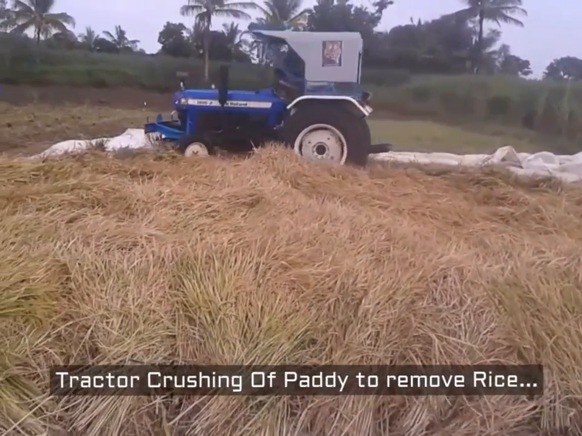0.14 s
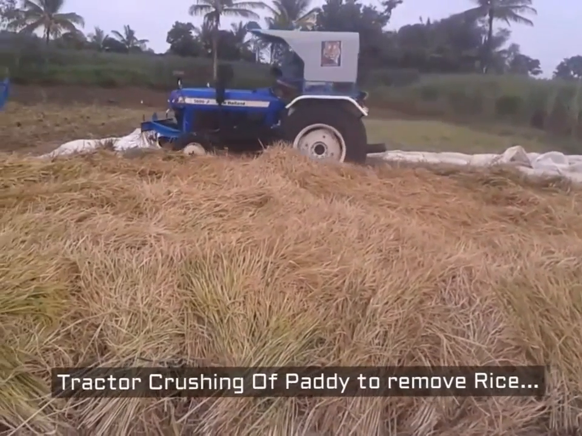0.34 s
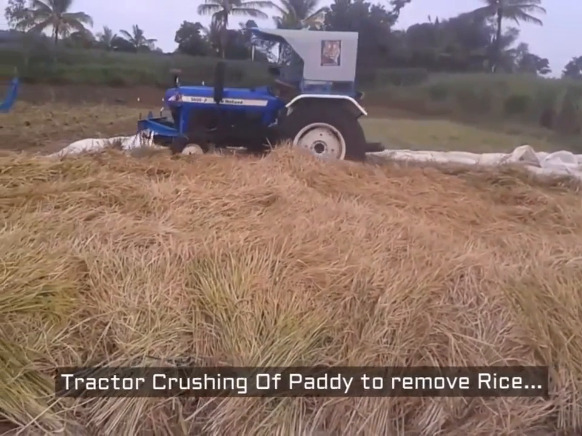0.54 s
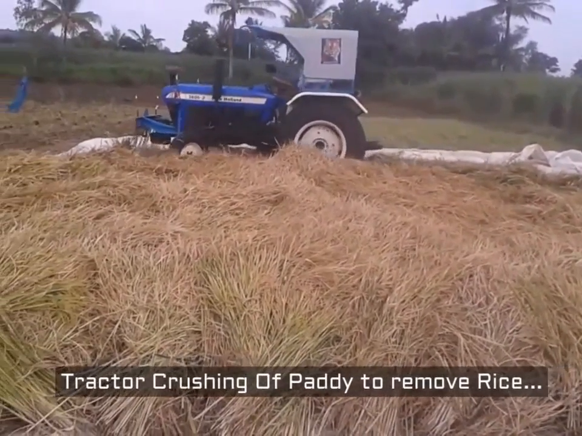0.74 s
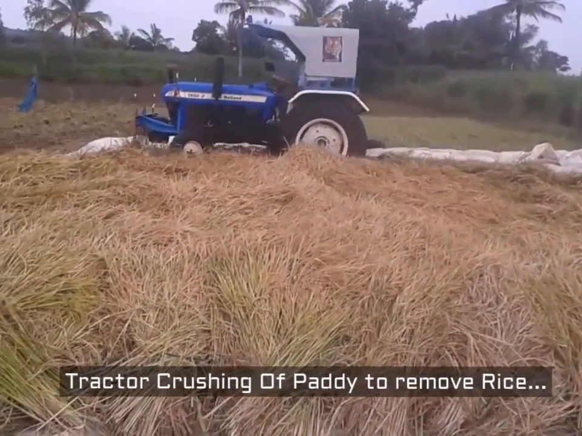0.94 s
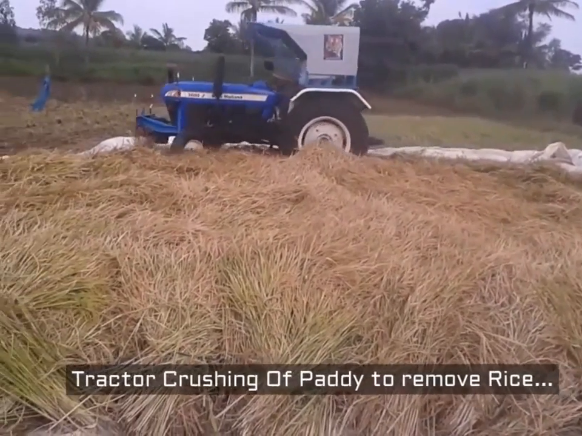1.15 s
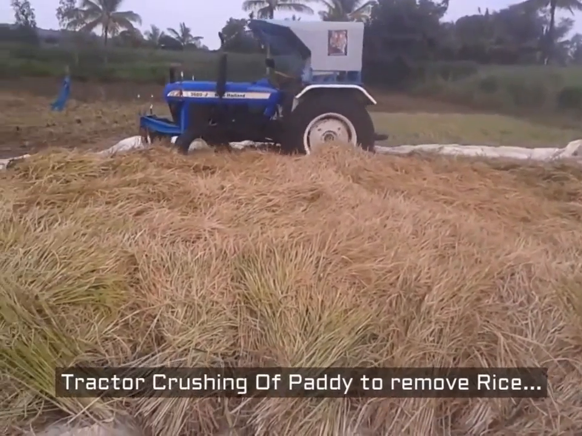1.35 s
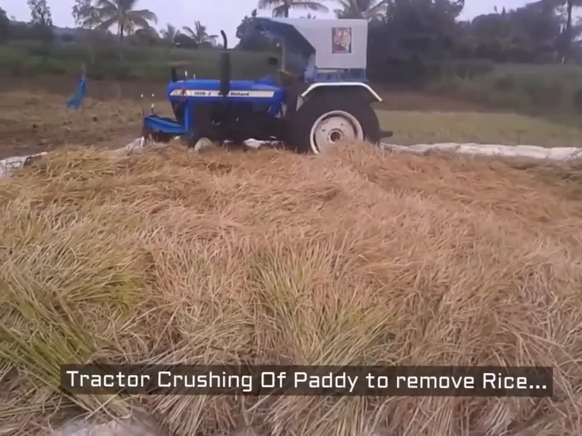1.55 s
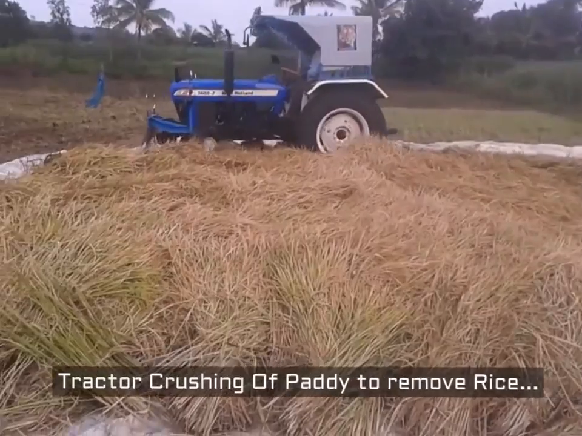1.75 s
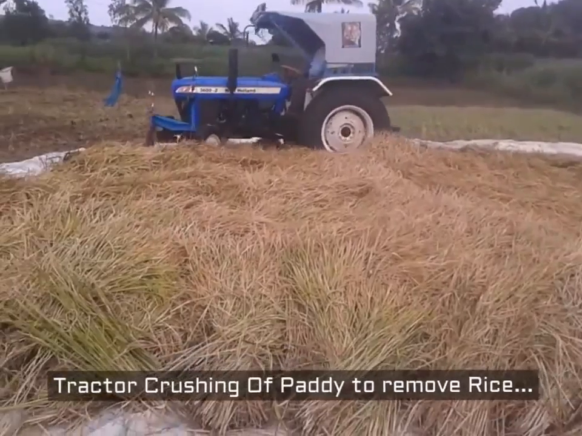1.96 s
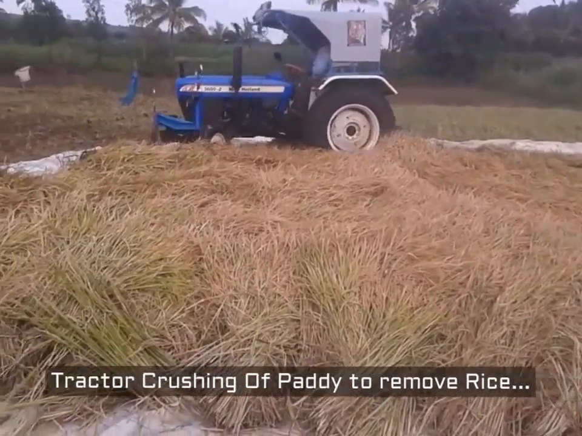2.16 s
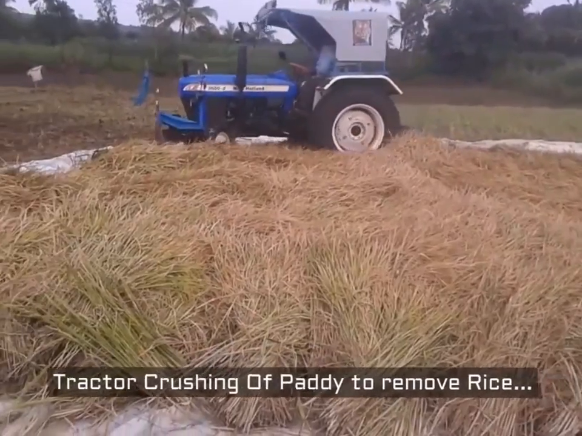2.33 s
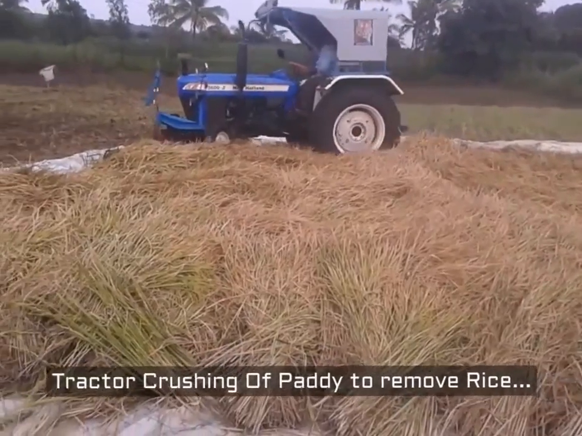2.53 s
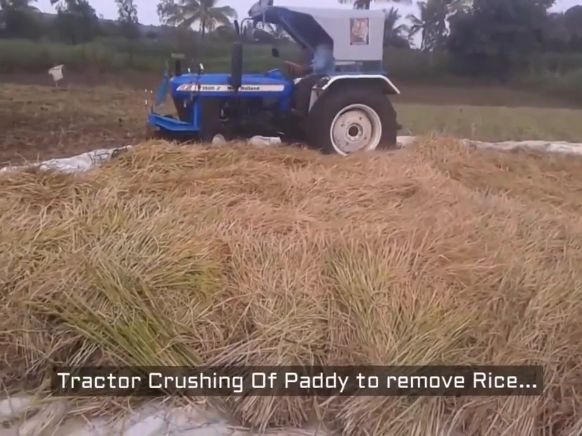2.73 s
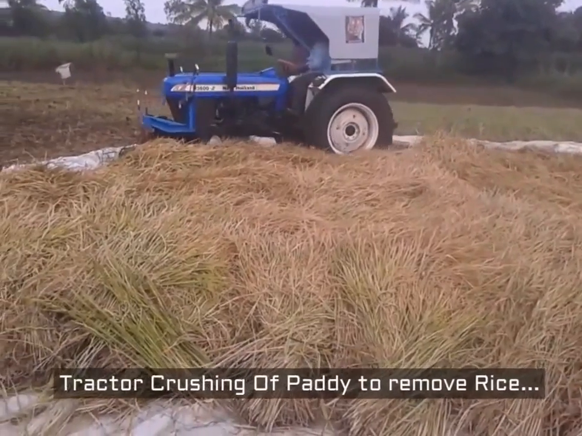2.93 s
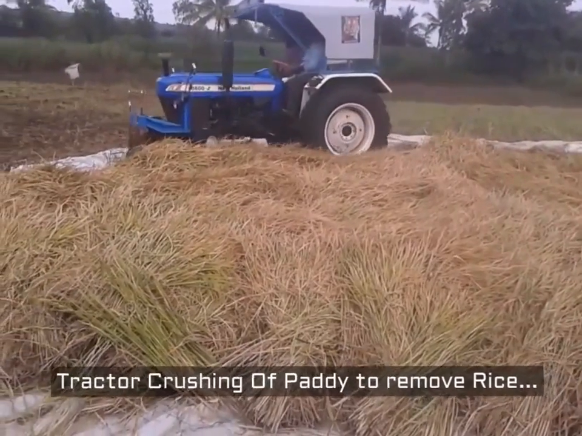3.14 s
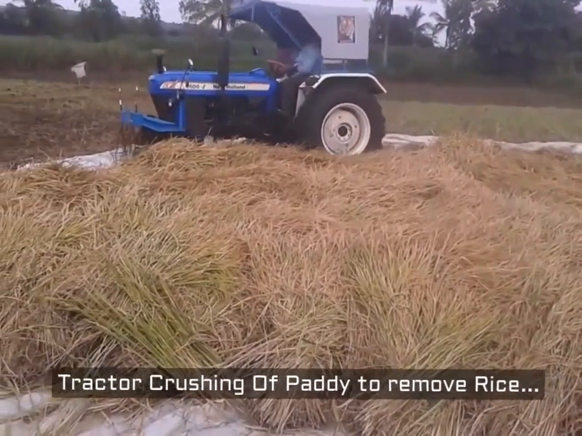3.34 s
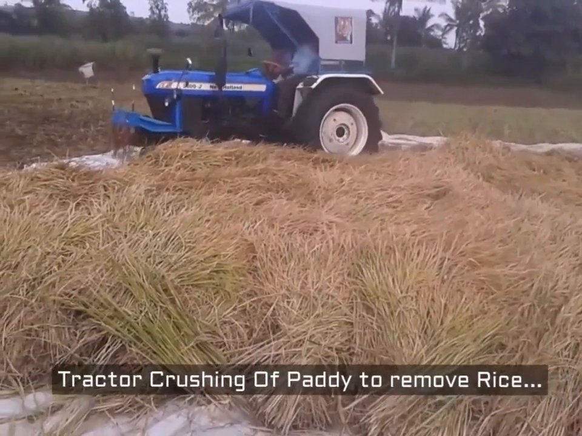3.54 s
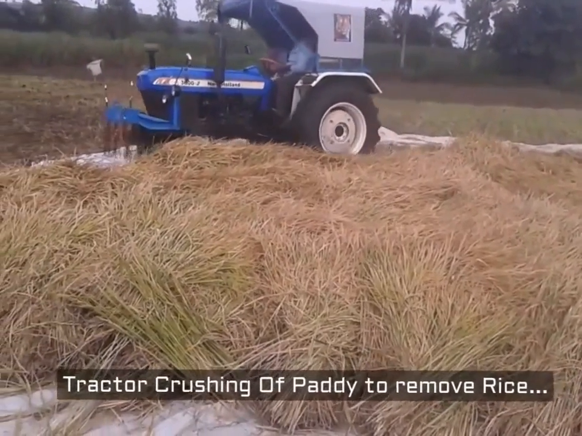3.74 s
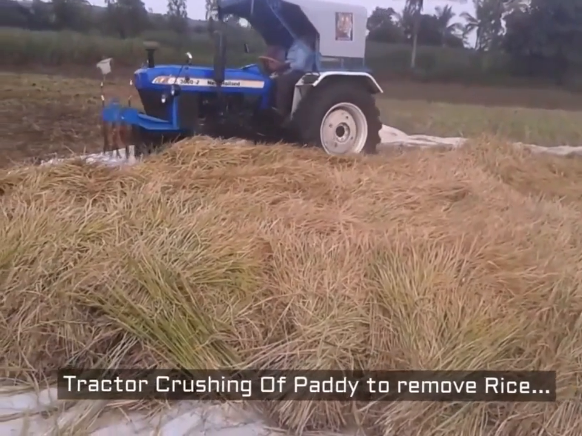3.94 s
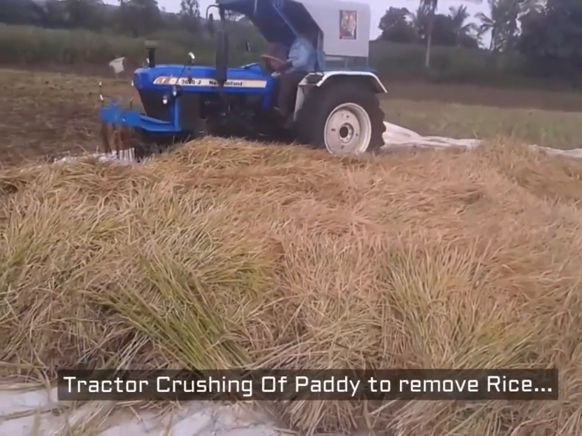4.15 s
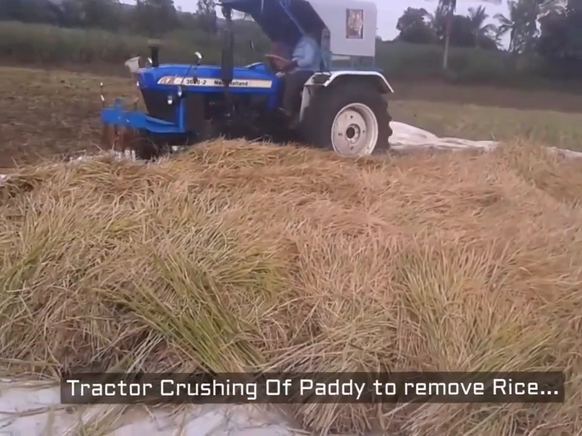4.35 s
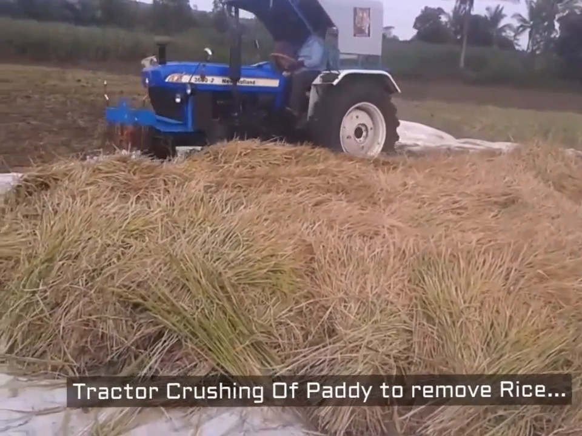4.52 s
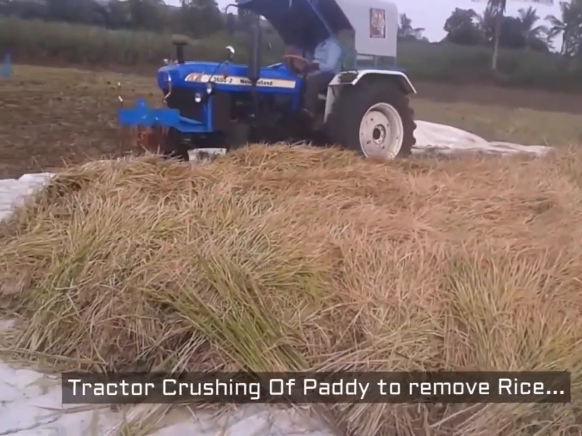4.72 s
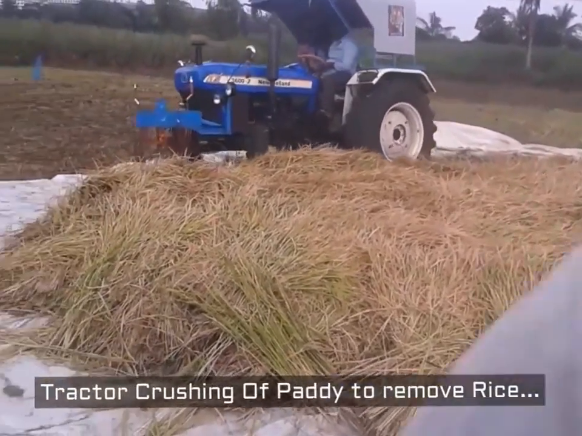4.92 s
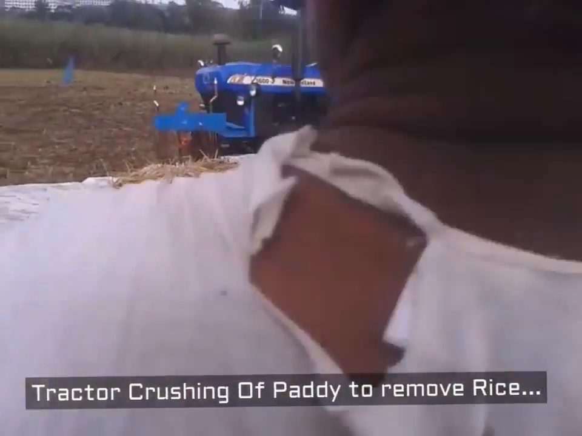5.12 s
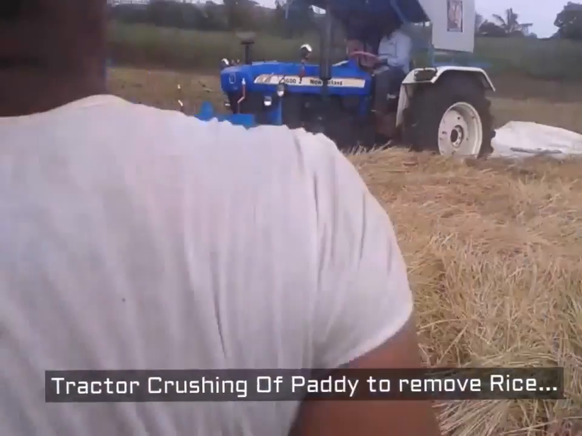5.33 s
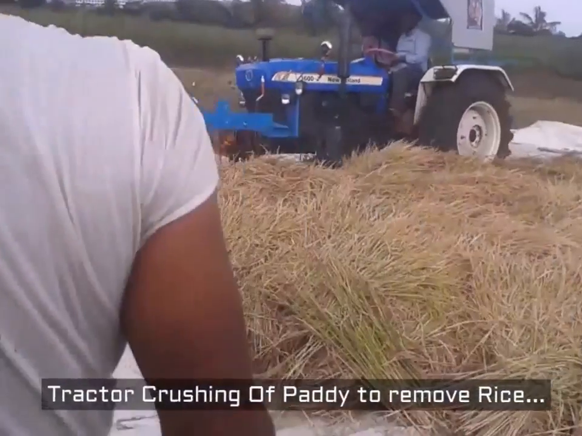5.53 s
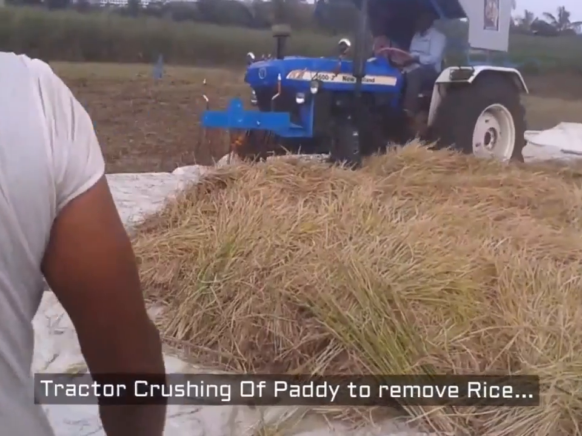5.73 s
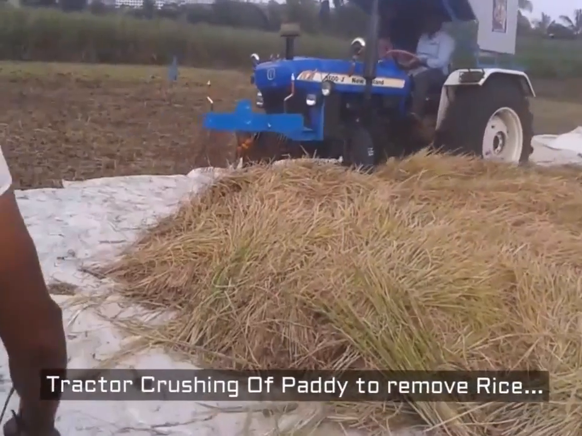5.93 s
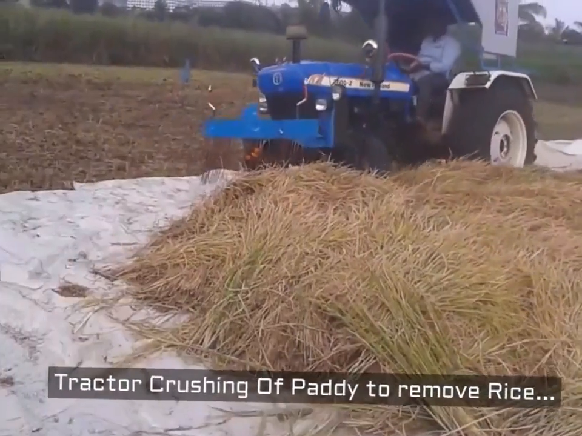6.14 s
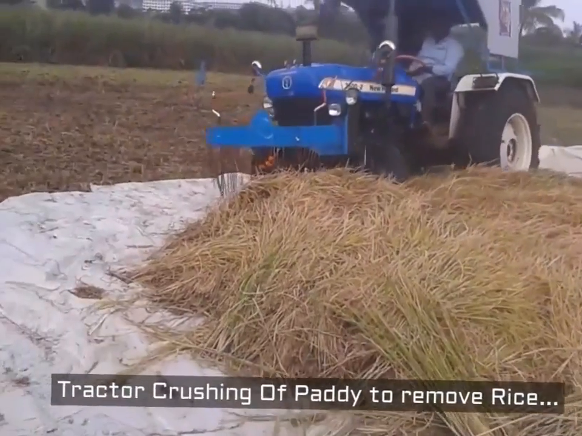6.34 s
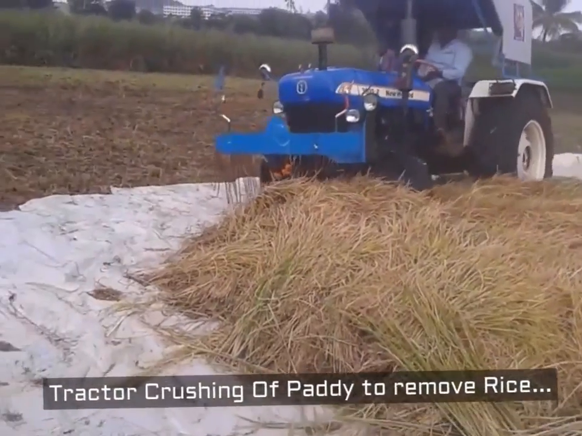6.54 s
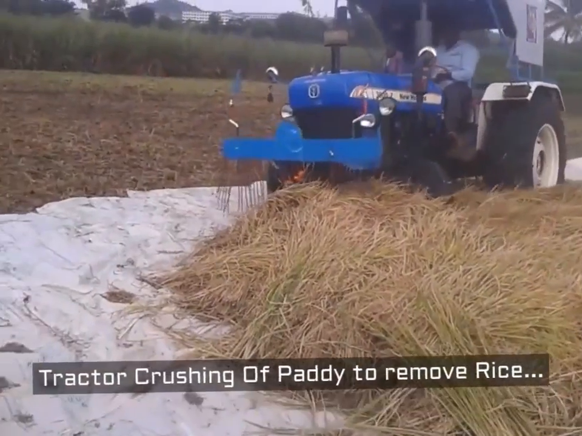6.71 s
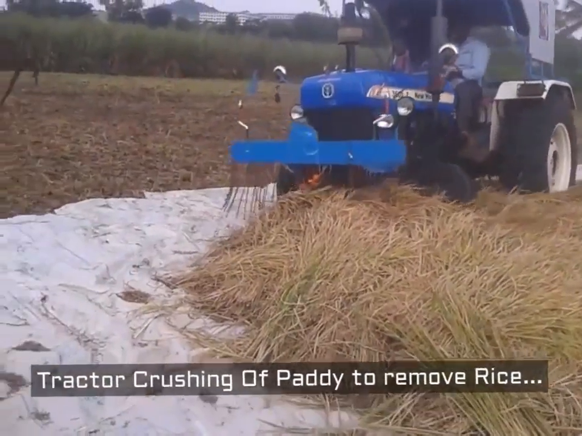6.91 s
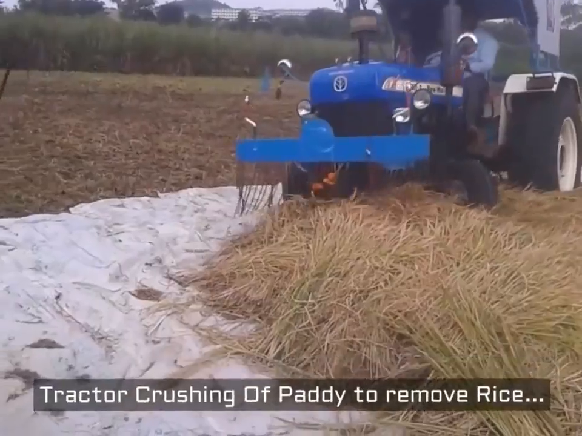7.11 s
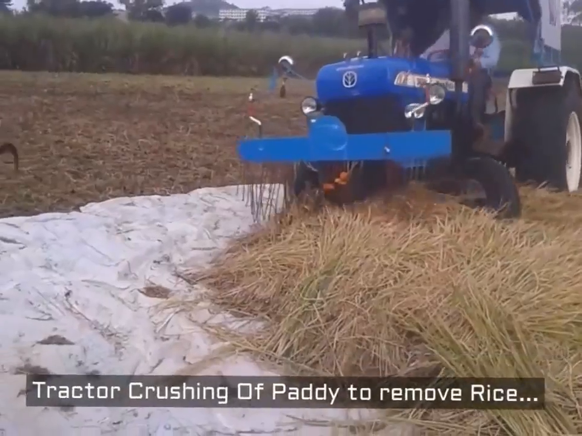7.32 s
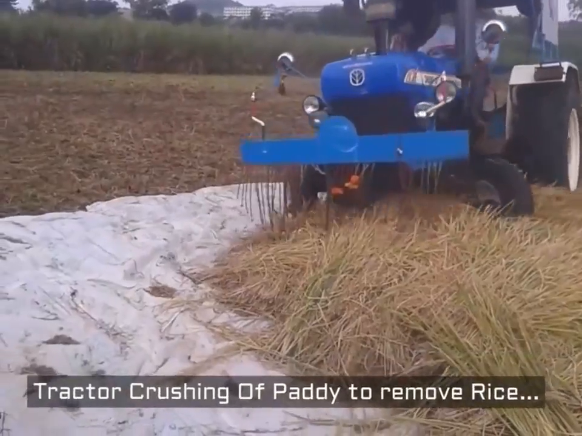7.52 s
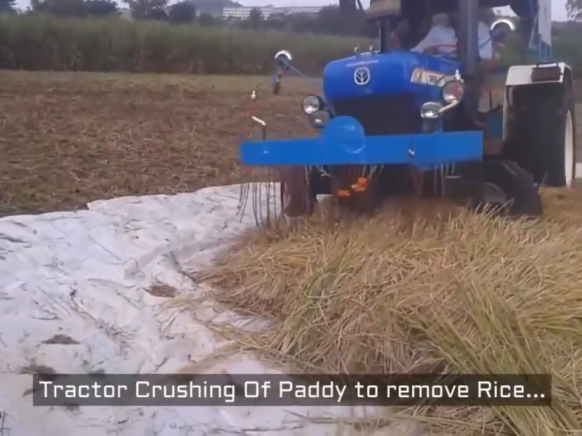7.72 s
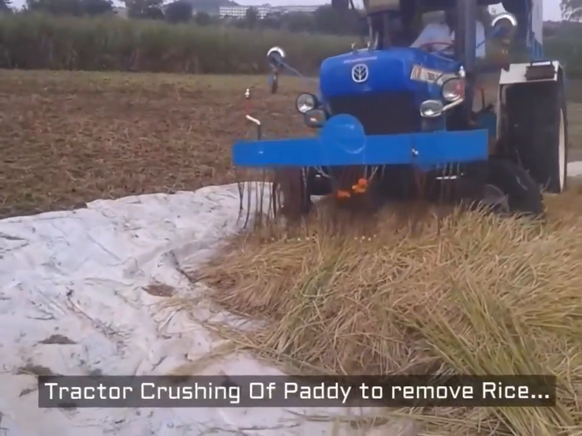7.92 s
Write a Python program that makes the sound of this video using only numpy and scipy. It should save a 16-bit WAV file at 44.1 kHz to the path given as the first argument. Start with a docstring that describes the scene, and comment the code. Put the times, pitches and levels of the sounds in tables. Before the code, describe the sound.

A three-cylinder diesel tractor clatters and lopes at low speed over dry straw outdoors, drawing nearer and louder, with brief crackling crunches.

```python
"""Diesel tractor on rice straw

A three-cylinder diesel tractor circles over heaped straw in an open field and comes towards the listener.
Each firing is three shaped noise bursts: a sharp crack, a duller knock and a puff, voiced by cylinder.
Surges of load make the firings and gears louder; filtered noise gives the gears, random snaps the straw.
A man walks past close by, briefly screens most of the engine and brushes through the straw."""
import sys
import numpy as np
from scipy import signal
from scipy.fft import rfft, irfft
from scipy.io import wavfile

SR = 44100
rng = np.random.default_rng(int(sys.argv[2]) if len(sys.argv) > 2 else 0)


def wav_record(signal):
    """Record a signal, one row per channel, as 16-bit PCM in the file named by sys.argv[1]."""
    frames = np.transpose(np.atleast_2d(signal))
    bounded = np.clip(frames, -1, 1)
    # unit amplitude maps onto the largest positive 16-bit level
    quanta = np.round(bounded * 32767).astype(np.int16)
    wavfile.write(sys.argv[1], SR, quanta)


N = 351477
TIME = np.arange(N) / SR


def from_db(db):
    """Level to amplitude: twenty decibels are a factor of ten."""
    return 10 ** (np.asarray(db) / 20)


def rms_one(x):
    """Normalisation: scale to unit mean power."""
    return x / np.sqrt(np.mean(x ** 2) + 1e-20)


def in_time(rows):
    """Linear interpolation: each column of a curve table, sample by sample."""
    s, *columns = np.transpose(rows)
    return [np.interp(TIME, s, c) for c in columns]


def drift(rate):
    """Random modulation: straight lines between `rate` chance values a second, with unit power."""
    knots = rng.standard_normal(8192)
    return rms_one(np.interp(TIME * rate, np.arange(len(knots)), knots))


def colour(x, spectrum=((1, 0),), peaks=(), size=4096):
    """Minimum-phase filtering: a broad spectrum with resonances on top, without pre-echo."""
    hz = np.maximum(np.fft.rfftfreq(size, 1 / SR), 1)
    points = np.array(spectrum, float)
    db = np.interp(np.log(hz), np.log(points[:, 0]), points[:, 1])
    for centre, width, height in peaks:
        db = db + height / (1 + (2 * (hz - centre) / width) ** 2)
    # folding the cepstrum onto positive times makes the response causal
    cepstrum = irfft(np.log(from_db(db)))
    cepstrum[1:size // 2] *= 2
    cepstrum[size // 2 + 1:] = 0
    response = irfft(np.exp(rfft(cepstrum)))
    return signal.oaconvolve(x, response)[:N]


def swell(x, track, width_hz, wander_db):
    """Moving resonance: a narrow band, lifted or lowered along a track, whose height also wanders."""
    hz, db = in_time(track)
    carrier = np.exp(2j * np.pi * np.cumsum(hz) / SR)
    # shift the band to zero frequency, smooth it there and shift it back
    r = np.exp(-np.pi * width_hz / SR)
    smooth = signal.lfilter([1 - r], [1, -r], x / carrier)
    band = 2 * np.real(carrier * smooth)
    return x + (from_db(db + wander_db * drift(20)) - 1) * band


def blows(times, gains, rise_s, length_s, tail_db, tail_s, alike, uneven_db, size=3000):
    """Impact noise: a burst at each time, partly repeating the last by the share `alike`."""
    age = np.arange(size) / SR
    body = np.exp(-(age / length_s) ** 2)
    tail = from_db(tail_db) * np.exp(-age / tail_s)
    shape = (1 - np.exp(-age / rise_s)) * (body + tail)
    alike = np.clip(alike, 0, .99)
    draws = rng.standard_normal((64, size + 1))  # one row a blow, the first value for its strength
    out, pattern = np.zeros(N + size), rng.standard_normal(size)
    for s, gain, fresh in zip(times, np.broadcast_to(gains, times.shape), draws):
        pattern = alike * pattern + np.sqrt(1 - alike ** 2) * fresh[1:]
        start = int(s * SR)
        out[start:start + size] += gain * from_db(uneven_db * fresh[0]) * shape * pattern
    return out[:N]


def rings(times, gains, hz, rise_s, length_s, uneven_db, detune, size=3000):
    """Modal vibration: each stroke sounds one short sine, varying in strength, pitch and phase."""
    age = np.arange(size) / SR
    shape = (1 - np.exp(-age / rise_s)) * np.exp(-(age / length_s) ** 2)
    out, hz = np.zeros(N + size), hz * np.ones(N)
    draws = rng.standard_normal((len(times), 3))
    for s, gain, (strength, off, turn) in zip(times, np.broadcast_to(gains, times.shape), draws):
        start = int(s * SR)
        tone = np.sin(2 * np.pi * (hz[start] * (1 + detune * off) * age + turn))
        out[start:start + size] += gain * from_db(uneven_db * np.tanh(strength)) * shape * tone
    return out[:N]


def snapping(spectrum, snaps_per_s, clump_db, clump_rate):
    """Shot noise: random snaps of dry stalks, stronger and weaker in clumps."""
    snaps = (rng.random(N) < snaps_per_s / SR) * rng.standard_normal(N)
    return rms_one(colour(snaps * from_db(clump_db * drift(clump_rate)), spectrum))


# the tractor draws nearer: (time [s], distance [m])
DISTANCE = [(0, 12.4), (1.2, 11.13), (3.5, 10.3), (5, 10.26), (6, 6.51), (7.97, 4.98)]
REFERENCE_M = 10


def nearness():
    """Inverse-distance law: amplitude relative to that at the reference distance."""
    return REFERENCE_M / in_time(DISTANCE)[0]


# the governor feeds more fuel as the wheels meet a hump: (start [s], start to release [s], lift [dB])
SURGES = [(-.01, 0.031, 5.5), (0.144, 0.032, 6), (0.598, 0.073, 3.5), (0.883, 0.16, 1.2),
          (1.395, 0.043, 3.5), (1.766, 0.32, 3), (2.17, 0.2, 3), (2.466, 0.1, 4), (2.942, 0.25, 4.5),
          (3.557, 0.059, 3.5), (3.827, 0.21, 4.5), (4.161, 0.31, 5.5), (4.53, 0.32, 4.5), (5.051, 0.035, 3),
          (5.381, 0.4, 3), (6.206, 0.36, 1), (6.592, 0.73, 1.53)]
SURGE_ATTACK_S, SURGE_RELEASE_S = 0.021, 0.11


def load():
    """Load response: each surge comes quickly, holds and dies away; the strongest one rules."""
    curves = []
    for s, hold_s, db in SURGES:
        attack = np.clip((TIME - s) / SURGE_ATTACK_S, 0, 1)
        release = np.exp(-np.maximum(TIME - s - hold_s, 0) / SURGE_RELEASE_S)
        curves.append(db * attack * release)
    return np.max(curves, axis=0)


# 0 = seen from the side, 1 = head-on: (time [s], share [0-1])
HEADING = [(0, 0.66), (1.6, 0.45), (3, 0.16), (4.8, 0.0077), (5.6, 0.46), (7.97, 0.87)]


def carried(carry, load_db):
    """Directivity and spreading: gain of one part of the tractor as it labours, nears and turns."""
    db, power, head_on_db, follows = carry
    return from_db(db + follows * load_db + head_on_db * in_time(HEADING)[0]) * nearness() ** power


# ground rumble, filter: (frequency [Hz], gain [dB])
GROUND = [(20, -3), (60, 0), (88, 9), (115, 5.5), (160, 1.5), (300, -24)]
# how each CARRY part carries: (level at the reference distance [dB], power of nearness,
# extra level head-on [dB], multiple of the surges' lift)
RUMBLE_CARRY = (-60, 1.5, -7, 0.5)
RUMBLE_DIPS_DB = 13  # depth of the random dips in level, for each unit of drift below zero


def rumble():
    """Rolling excitation: uneven ground drives the wheels, a low rumble of uneven strength."""
    dips = from_db(RUMBLE_DIPS_DB * np.minimum(drift(11), 0))
    return rms_one(colour(rng.standard_normal(N), GROUND) * dips)


# snapping stalks under the wheels, filter: (frequency [Hz], gain [dB])
STALKS = [(300, -33), (1500, -17), (4000, 2.5), (6000, -2), (8000, -1), (12000, -10.5), (16000, -14.5)]


def straw():
    """Brittle fracture: dry stalks snap in dense clumps."""
    return snapping(STALKS, snaps_per_s=3500, clump_db=4.5, clump_rate=130)


STRAW_DB = -41.5  # steady rustle at the reference distance
# thick bundles of straw give way: (time of peak [s], time to swell and to fade [s], level [dB])
CRUNCHES = [(3.08, 0.12, -47), (4.33, 0.04, -24), (7.45, 0.4, -28.5)]


def crushing():
    """Amplitude envelope of the straw: a steady rustle that nears, and a swell for each bundle."""
    bundles = sum(from_db(db) * np.exp(-abs(TIME - s) / length_s) for s, length_s, db in CRUNCHES)
    return from_db(STRAW_DB) * nearness() + bundles


# dull low thumps, mostly as the engine surges: (time [s], level before the boost and filter [dB])
THUDS = [(3.1, -45), (4.31, -44), (4.62, -48), (5.409, -41), (5.71, -44)]
# dull thud, filter: (frequency [Hz], gain [dB])
THUD = [(30, -8), (80, 7), (135, 13), (200, 11), (290, 21), (420, 2), (900, -23)]


def thuds():
    """Damped noise burst: a soft, low thud."""
    times, db = np.transpose(THUDS)
    hits = blows(times, from_db(db), rise_s=0.015, length_s=0.051, tail_db=-14, tail_s=.05,
                 alike=0.0, uneven_db=1.5, size=9000)
    boost_db = 9
    return from_db(boost_db) * colour(hits, THUD)


# straw brushed by the man as he steps aside, filter: (frequency [Hz], gain [dB])
SWISH = [(100, -60), (500, -32), (2000, -6), (3300, -1.5), (5500, 1), (7500, -9.5), (11000, -15),
         (16000, -20)]
SWISH_AT_S, SWISH_HALF_S, SWISH_DB = 5.69, 0.094, -19


def swish():
    """Frictional shot noise: one brief brush through dry stalks, a crowd of small snaps."""
    stalks = snapping(SWISH, snaps_per_s=5000, clump_db=2.5, clump_rate=250)
    return from_db(SWISH_DB) * np.exp(-((TIME - SWISH_AT_S) / SWISH_HALF_S) ** 2) * stalks


# resonances that face the listener as the tractor turns: (time [s], frequency [Hz], lift [dB])
LOW_PING = [(0, 3606, 4), (1, 3670, 7), (2.4, 3410, -5), (3.15, 3290, 10), (4.1, 3218, 14), (4.5, 3380, 10),
            (4.9, 3444, 11), (5.8, 3720, 6), (6.33, 3610, 13), (6.55, 3520, -3), (7.1, 3400, 13.5),
            (7.6, 3377, 9)]
MIDDLE_PING = [(0.8, 4550, -12), (2.2, 4840, 9.5), (3.3, 4660, -2.5), (4.2, 4540, 8.5), (5.4, 4465, 8),
               (5.9, 4560, 15), (6.4, 4720, 11), (6.9, 4460, 7), (7.5, 4130, 9.5)]
HIGH_PING = [(0.1, 5200, 6.1), (.7, 5350, 3.9), (1.4, 5550, 6.4), (2.4, 5695, 2), (2.9, 4950, 3),
             (3.6, 5140, 9.9), (4.1, 5280, 8.5), (4.8, 5370, 11.3), (5.8, 5310, 3), (7.4, 5290, 5.4)]
# gear whirr, filter: (frequency [Hz], gain [dB])
GEARS = [(200, -14), (900, 2), (2000, 8), (2350, -8.5), (2750, -1.5), (4000, -2.5), (5400, 1.5),
         (6300, -4.5), (8000, -13), (11000, -15.5), (13000, -25), (16000, -37)]
# columns as for RUMBLE_CARRY
GEAR_CARRY = (-30, 0.96, -0.5, 1.12)


def gears():
    """Broadband noise through resonators: gears and fan whirr on through the ringing castings."""
    flutter_db, ring_share = 2.0, 0.55
    out = colour(rng.standard_normal(N) * from_db(flutter_db * drift(300)), GEARS)
    ringing = out
    for track in (LOW_PING, MIDDLE_PING, HIGH_PING):
        ringing = swell(ringing, track, width_hz=136, wander_db=1.5)
    return rms_one(out + ring_share * (ringing - out))


# engine speed: (time [s], speed [revolutions per minute])
SPEED = [(0.0, 815.7), (0.39, 818.0), (0.946, 720.6), (1.257, 707.8), (1.774, 790.2), (2.018, 878.3),
         (2.842, 808.7), (3.039, 822.5), (3.374, 921.5), (4.289, 798.4), (4.699, 874.1), (5.541, 818.4),
         (5.78, 885.4), (6.098, 856.4), (6.606, 910.9), (7.383, 787.1), (7.82, 781.0), (7.98, 758.6)]


def revolutions():
    """Phase as the integral of speed: turns of the crankshaft so far."""
    return np.cumsum(in_time(SPEED)[0]) / SR / 60


# a tone heard briefly as the tractor turns side-on:
# (cycles per revolution, time of peak [s], time to swell and to fade [s], level [dB])
HUM = (13.3, 3.5, 0.4, -53)


def hum():
    """Order tone: a faint, wavering sine locked to the crankshaft glides with the engine speed."""
    order, at_s, half_s, db = HUM
    waver_db = 2.5
    gain = from_db(db + waver_db * drift(10)) * np.exp(-((TIME - at_s) / half_s) ** 2)
    return gain * np.sqrt(2) * np.sin(2 * np.pi * order * revolutions())


# one row a cylinder: (crack [dB], knock [dB], knock delay [firing intervals], exhaust [dB])
CYLINDERS = [(0.8, 0.5, .35, -1.6), (2.2, 0, .35, 0.5), (1.2, 0, .36, 0)]
FIRST_FIRING = .785  # firing intervals before the first cylinder's cycle begins


def firings(cylinder, delay):
    """Four-stroke timing: when one cylinder, firing every second turn, passes a point of its cycle."""
    count = len(CYLINDERS)
    phase = revolutions() * count / 2 - FIRST_FIRING
    marks = np.arange(cylinder - count, phase[-1], count) + delay
    inside = (marks > phase[0]) & (marks < phase[-1])
    return np.interp(marks[inside], phase, TIME)


# exhaust filter: (frequency [Hz], gain [dB])
EXHAUST = [(40, -43), (100, -31.5), (160, -14.5), (240, -12), (310, -1), (400, -1.5), (460, 2), (560, -1.5),
           (650, -17.5), (900, -5.5), (2000, -48.5)]
# resonance of the exhaust: (frequency [Hz], width [Hz], gain [dB])
EXHAUST_PEAKS = [(203, 12, 2.8)]
# the resonance each cylinder favours in its puff: (frequency [Hz], width [Hz], gain [dB])
EXHAUST_VOICES = [(424.6, 27, 7), (384.5, 40, 6.1), (295, 18, 2.3)]
# moving boom of the pipe: (time [s], frequency [Hz], lift [dB])
PIPE_BOOM = [(0.8, 428, 2.8), (2.2, 440, 5), (4.3, 441, 5.5), (5.4, 310, 1), (6.2, 493, 2.7),
             (7.1, 404, 2.3), (7.8, 400, 8.5)]
# columns as for RUMBLE_CARRY
EXHAUST_CARRY = (-36, 1.33, -0.5, 1.11)


def exhaust():
    """Pulsed flow through a resonator: one hollow puff a firing through the silencer."""
    out = 0
    for k, (_, _, _, puff_db) in enumerate(CYLINDERS):
        puffs = blows(firings(k, delay=.33), from_db(puff_db), rise_s=0.0024, length_s=0.0045,
                      tail_db=8, tail_s=0.059, alike=0.69, uneven_db=.5, size=5000)
        out = out + colour(puffs, peaks=[EXHAUST_VOICES[k]])
    hollow = colour(out, EXHAUST, EXHAUST_PEAKS)
    return rms_one(swell(hollow, PIPE_BOOM, width_hz=20, wander_db=1.35))


# engine block filter: (frequency [Hz], gain [dB])
BLOCK = [(800, -49), (1600, -7.5), (1850, -3.5), (2080, 0), (2200, -17.5), (2350, -24.5), (4000, -53.5)]
# resonance of the block: (frequency [Hz], width [Hz], gain [dB])
BLOCK_PEAKS = [(2020, 230, 2.4)]
# columns as for RUMBLE_CARRY
BLOCK_CARRY = (-26.5, 1, -7.5, 0.98)


def block_ring():
    """Structural resonance: knocks, and more weakly cracks, ring the block near two kilohertz."""
    out, crack_db = 0, -8
    for k, (_, knock_db, delay, _) in enumerate(CYLINDERS):
        out = out + blows(firings(k, delay), from_db(knock_db), rise_s=0.0007, length_s=0.014,
                          tail_db=2, tail_s=0.032, alike=0.5, uneven_db=1.0)
        out = out + blows(firings(k, delay=0.0303), from_db(crack_db), rise_s=0.00056, length_s=0.0062,
                          tail_db=5, tail_s=0.016, alike=0.5, uneven_db=0.0)
    return rms_one(colour(out, BLOCK, BLOCK_PEAKS))


# bonnet modes: frequency [Hz]
CLANK_MODES = [1170, 1270, 1390]
# the clank as the tractor turns: (time [s], level [dB])
CLANK = [(0, -22.5), (1.1, -20.5), (1.9, -29), (2.6, -22.5), (3.5, -24), (4.5, -28), (4.72, -15.5),
         (4.9, -27), (5.35, -27), (5.6, -18), (6.3, -20.5), (6.9, -15.5), (7.4, -24)]
CLANK_DETUNE, CLANK_UNEVEN_DB = .028, 2  # spread of each mode in pitch (share) and in strength


def clanks():
    """Forced modes: once a cycle the last cylinder's knock rings the bonnet, giving the engine its lope."""
    _, _, delay, _ = CYLINDERS[-1]
    times = firings(len(CYLINDERS) - 1, delay)
    modes = sum(rings(times, 0.96, hz, rise_s=0.0035, length_s=0.021,
                      uneven_db=CLANK_UNEVEN_DB, detune=CLANK_DETUNE) for hz in CLANK_MODES)
    return from_db(in_time(CLANK)[0]) * modes


# hard piston slaps: (time [s], level before the filter [dB])
SLAPS = [(.154, -10), (.655, -9), (1.79, -8.5), (1.934, -6), (2.074, -6), (2.21, -4.5), (2.354, -8),
         (2.495, -8), (4.713, -9), (4.804, -5), (5.092, -7), (6.529, -9), (6.799, -5), (6.936, -9)]
# slap filter: (frequency [Hz], gain [dB])
SLAP = [(300, -28), (1100, 1), (1400, -2), (1900, 11.5), (2120, 10), (2350, -5), (3000, -9), (8000, -42),
        (16000, -52)]


def slaps():
    """Impact: now and then a piston slaps its liner hard, a short, dry clack."""
    times, db = np.transpose(SLAPS)
    hits = blows(times, from_db(db), rise_s=.0002, length_s=0.0016, tail_db=-6.5, tail_s=0.0052,
                 alike=1.0, uneven_db=2.0)
    return colour(hits, SLAP)


# knock filter: (frequency [Hz], gain [dB])
KNOCK = [(200, -42), (500, -28), (680, -16.5), (900, -3.5), (1150, 5), (1400, 1.5), (1750, -2), (2100, -6),
         (2350, -5.5), (2750, -1.5), (3100, -7), (5000, -13.5), (7000, -28.5), (16000, -56)]
# resonances shared by all knocks: (frequency [Hz], width [Hz], gain [dB])
KNOCK_PEAKS = [(1497, 9.3, 8.9), (1690, 61, 3.9)]
# the resonance each cylinder favours in its knock: (frequency [Hz], width [Hz], gain [dB])
KNOCK_VOICES = [(1660, 250, 0.5), (1493, 150, 7), (1316, 390, 3)]
# moving ring of the panels: (time [s], frequency [Hz], lift [dB])
PANEL_RING = [(1.2, 1246, 7.5), (1.65, 1103, 8.5), (2.1, 1150, 2), (4.3, 1203, 1)]
# columns as for RUMBLE_CARRY
KNOCK_CARRY = (-31, 0.83, 2, 1)


def knocks():
    """Impact and resonance: pistons and valve gear strike between cracks, each cylinder in its voice."""
    out = 0
    for k, (_, knock_db, delay, _) in enumerate(CYLINDERS):
        hits = blows(firings(k, delay), from_db(knock_db), rise_s=0.00055, length_s=0.022,
                     tail_db=-3, tail_s=0.02, alike=0.5, uneven_db=1.0)
        out = out + colour(hits, peaks=[KNOCK_VOICES[k]])
    churn_db = -5  # steady noise beneath the knocks
    churning = rms_one(out) + from_db(churn_db) * rng.standard_normal(N)
    out = colour(churning, KNOCK, KNOCK_PEAKS)
    return rms_one(swell(out, PANEL_RING, width_hz=30, wander_db=2.0))


# crack filter: (frequency [Hz], gain [dB])
CRACK = [(150, -23), (320, -5), (480, -4.5), (660, -8), (850, -6.5), (1200, -0.5), (1950, 1.5),
         (2350, -5.5), (3000, 0), (5300, -3), (6300, -5.5), (8000, -11), (9000, -15.5), (11500, -17),
         (13000, -27), (16000, -37)]
# firings that crack harder or softer than their neighbours: (time [s], extra level [dB])
ODD_FIRINGS = [(1.292, 3.5), (1.405, 5.5), (1.92, -2), (2.719, 2), (2.866, 3.5), (2.964, 2), (3.108, 5),
               (3.157, 3.5), (3.295, 4), (3.925, 2.5), (4.264, -5), (4.311, 4.5), (4.603, 4.5),
               (4.649, 4.5), (4.742, -6), (4.927, 1.5), (5.067, 1.5), (5.403, 3), (5.497, 4.5), (5.545, 3),
               (5.871, 7), (5.917, 3.5), (6.377, 4.5), (6.422, 2.5), (6.514, -3), (7.009, 2.5),
               (7.059, 2.5), (7.154, 2.5), (7.203, 1), (7.301, 3), (7.352, 0.5), (7.452, 3.5), (7.708, 2)]
# slow changes of the crack's treble: (time [s], lift [dB])
CRACK_TREBLE = [(0, -1.5), (1.3, 2.5), (3.1, 0.5), (5.6, -0.5), (6.4, -1), (7.2, 1.5), (7.9, 0.5)]
# columns as for RUMBLE_CARRY
CRACK_CARRY = (-29.5, 1.27, -1, 1.24)
REBOUND_S, REBOUND_DB = .0048, -5  # each crack strikes twice
PING_DB = -17  # a casting's ping against the crack that rings it, before its lift
PING_DETUNE, PING_UNEVEN_DB = .011, 5.5  # spread of each ping in pitch (share) and in strength


def cracks():
    """Impulsive excitation: abrupt ignition gives a bright clack and rebound, and the castings ping."""
    out, strokes = 0, []
    for k, (crack_db, _, _, _) in enumerate(CYLINDERS):
        times, db = firings(k, delay=.03), crack_db
        for s, extra_db in ODD_FIRINGS:
            this_one = abs(times - s) < .02
            times = np.where(this_one, s, times)
            db = db + extra_db * this_one
        out = out + blows(times, from_db(db), rise_s=0.00045, length_s=0.0057,
                          tail_db=-21, tail_s=0.027, alike=0.4, uneven_db=.5)
        out = out + blows(times + REBOUND_S, from_db(db + REBOUND_DB), rise_s=0.00044, length_s=0.0065,
                          tail_db=-7.5, tail_s=0.023, alike=0.38, uneven_db=1.0)
        strokes.append([times, from_db(db)])
    grit_db, treble_hz = 1.5, 6500
    out = colour(out * from_db(grit_db * drift(900)), CRACK)
    treble = signal.sosfilt(signal.butter(1, treble_hz, "high", fs=SR, output="sos"), out)
    out = rms_one(out + (from_db(in_time(CRACK_TREBLE)[0]) - 1) * treble)
    times, gains = np.hstack(strokes)
    for track in (LOW_PING, MIDDLE_PING, HIGH_PING):
        hz, lift_db = in_time(track)
        ping = rings(times, gains, hz, rise_s=0.0013, length_s=.009,
                     uneven_db=PING_UNEVEN_DB, detune=PING_DETUNE)
        out = out + from_db(PING_DB + lift_db) * rms_one(ping)
    return rms_one(out)


SCREEN_AT_S, SCREEN_HALF_S, SCREEN_LOSS_DB = 5.31, 0.11, 3


def screening():
    """Barrier loss: the clatter and clank dip while the man is in front of the engine."""
    return from_db(-SCREEN_LOSS_DB * np.exp(-((TIME - SCREEN_AT_S) / SCREEN_HALF_S) ** 2))


# bands of the clatter that sink or rise as the tractor turns: (time [s], frequency [Hz], lift [dB])
LOW_HOLLOW = [(.5, 3200, -11), (2, 3080, 1), (4, 2870, -2.5), (6.2, 3180, 0.5), (7.4, 3060, -11)]
HIGH_HOLLOW = [(.5, 4120, -9), (2, 4150, -3.5), (4, 4250, -2), (6.2, 4060, 2.5), (7.4, 3680, -3)]
# what the open front of the engine adds: (frequency [Hz], width [Hz], gain [dB])
FRONT_PEAKS = [(895, 244, 6.5), (2920, 290, -0.5), (3860, 1800, 2)]


def scene():
    """Superposition: the engine, shaped by load and heading, with thuds, wheels and the man's step."""
    load_db = load()
    clatter = carried(KNOCK_CARRY, load_db) * knocks()
    clatter += carried(CRACK_CARRY, load_db) * cracks()
    clatter += carried(BLOCK_CARRY, load_db) * block_ring()
    clatter += carried(GEAR_CARRY, load_db) * gears()
    for track in (LOW_HOLLOW, HIGH_HOLLOW):
        clatter = swell(clatter, track, width_hz=230, wander_db=1.5)
    engine = screening() * (clatter + clanks())
    engine += carried(EXHAUST_CARRY, load_db) * exhaust() + slaps() + hum()
    head_on, = in_time(HEADING)
    engine += head_on * (colour(engine, peaks=FRONT_PEAKS) - engine)
    # high-pass: the engine is heard with little deep bass
    bass_hz = 150
    engine = signal.sosfilt(signal.butter(4, bass_hz, "high", fs=SR, output="sos"), engine)
    wheels = crushing() * straw()
    low_thuds = thuds()
    wheels += carried(RUMBLE_CARRY, load_db) * rumble()
    return (engine + wheels + low_thuds + swish())[None]


CUTOFF_HZ = 15750


def record(dry):
    """Saturation and band limiting: the highest peaks are rounded and the top of the treble is cut."""
    rounded = 1.1 * np.tanh(dry / 1.1)
    return signal.sosfilt(signal.ellip(12, .1, 90, CUTOFF_HZ, fs=SR, output="sos"), rounded)


dry = scene()
out = record(dry)
wav_record(out)
```